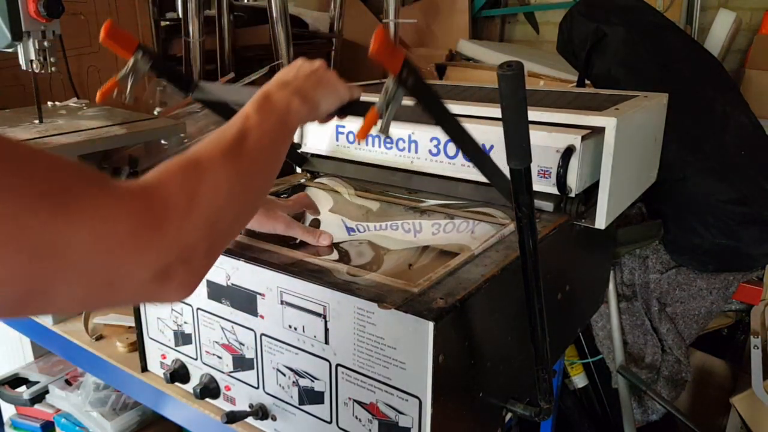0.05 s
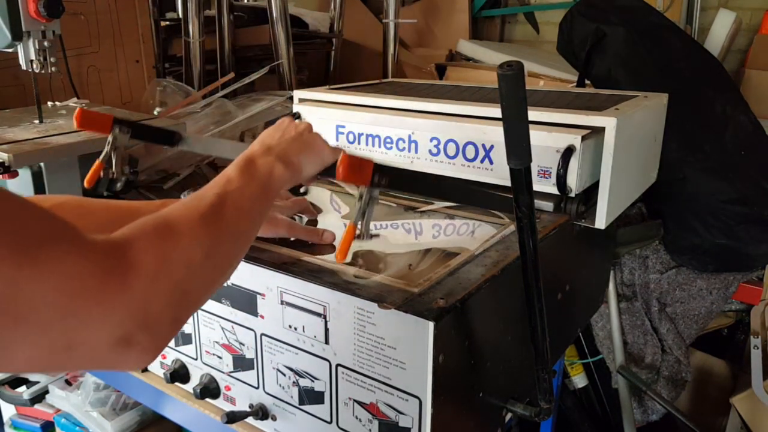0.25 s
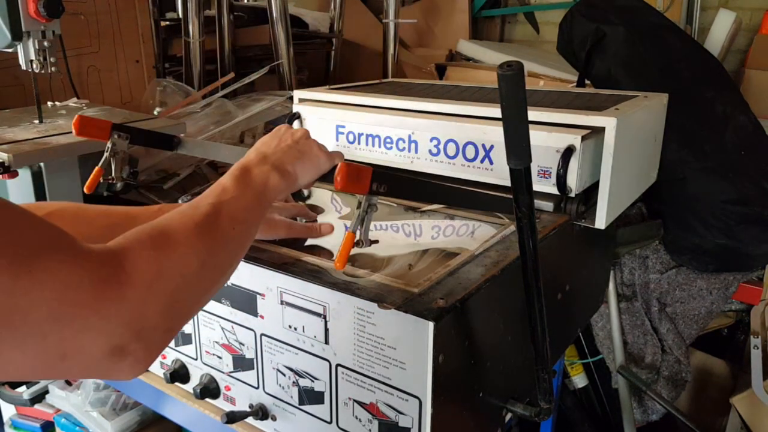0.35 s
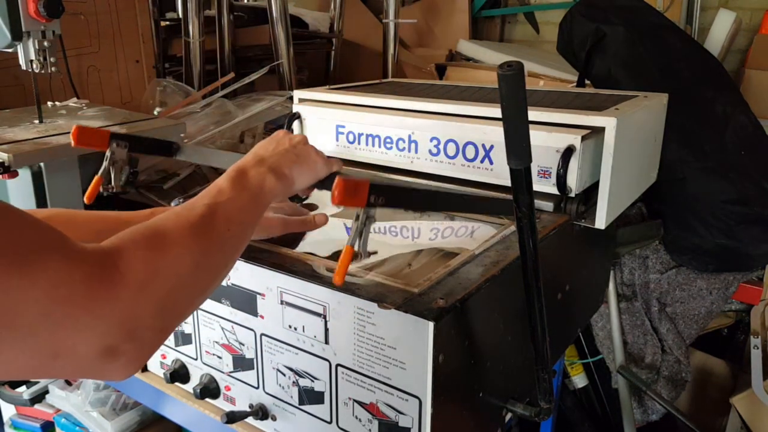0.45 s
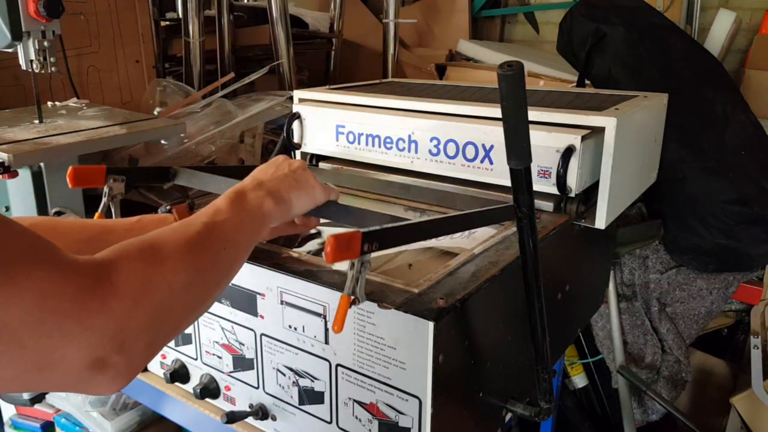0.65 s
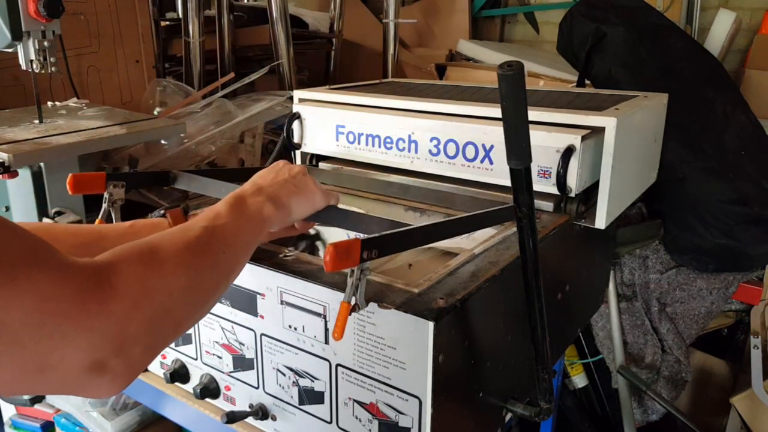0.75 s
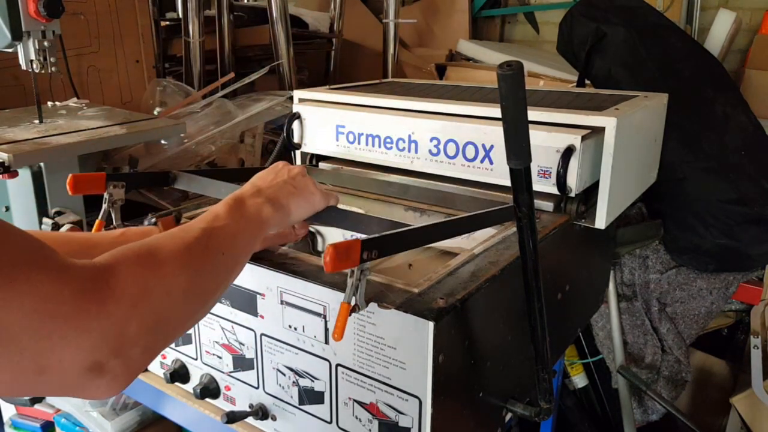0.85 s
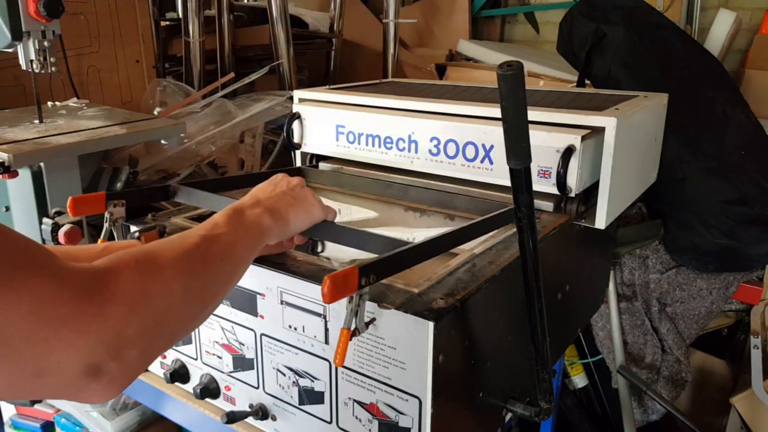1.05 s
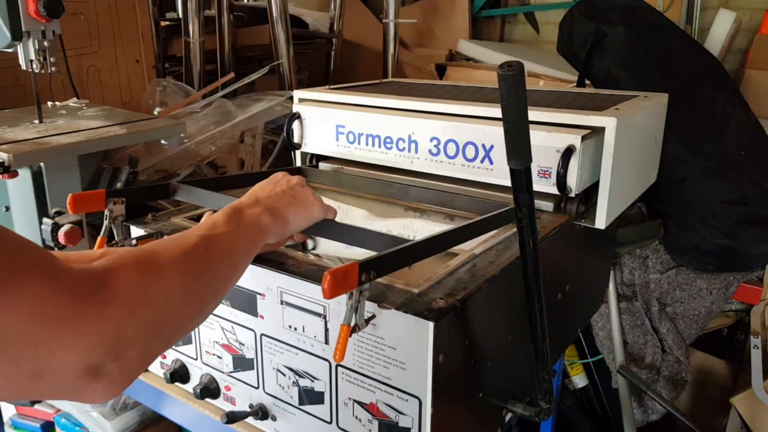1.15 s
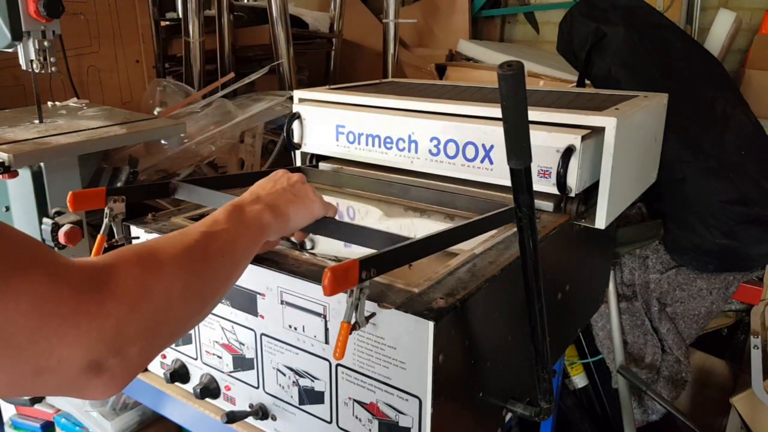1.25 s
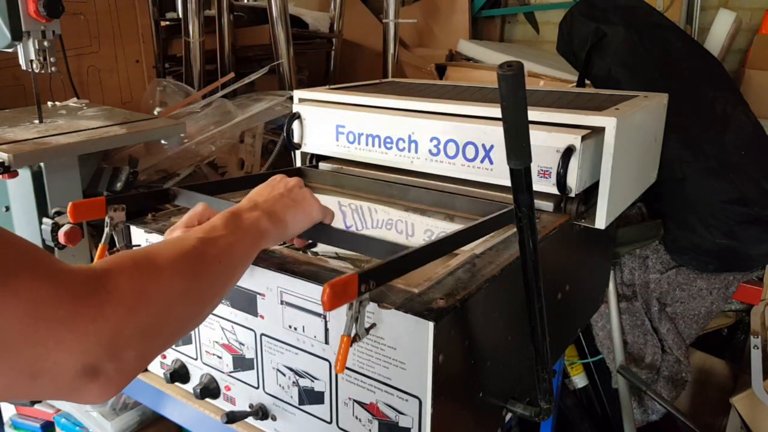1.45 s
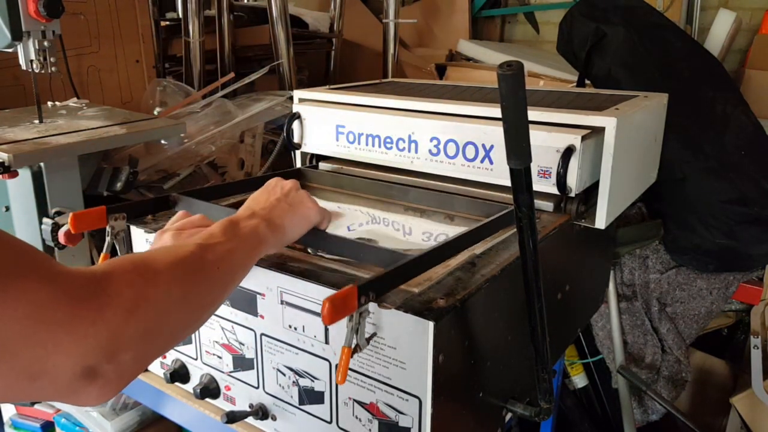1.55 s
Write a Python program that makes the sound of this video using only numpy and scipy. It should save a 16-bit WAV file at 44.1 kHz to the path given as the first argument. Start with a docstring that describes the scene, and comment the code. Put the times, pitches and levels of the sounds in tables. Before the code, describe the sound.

Close up in a small workshop, a metal frame clanks and rattles onto a sheet-metal cabinet, soft thuds and a faint squeal follow, then a sharp steel snap with a low boom, over quiet hum and hiss.

```python
"""Steel frame landing on a machine

A steel clamping frame drops onto a vacuum forming machine in a small workshop and lands with a rattling clank.
It bumps dully as it is pressed home, then a clamp scrapes and snaps shut; a thin squeal comes and goes.
Blows are decaying noise bands plus beating modes; rubs are swelling noise bands; the squeal is wavering sines.
A low hum and a steady bed of rumble and hiss lie beneath, made of shaped noise."""
import sys
import numpy as np
from scipy import signal
from scipy.fft import rfft, irfft
from scipy.io import wavfile

SR = 44100
rng = np.random.default_rng(int(sys.argv[2]) if len(sys.argv) > 2 else 0)


def output_pcm(signal):
    """Save a mono or channel-first signal as 16-bit PCM at the path in sys.argv[1].

    Samples are clipped to [-1, 1] before scaling.
    """
    pcm = np.clip(np.atleast_2d(signal).T, -1, 1) * 32767
    wavfile.write(sys.argv[1], SR, np.round(pcm).astype(np.int16))


N = 70560
T = np.arange(N) / SR  # time [s]
HZ = np.fft.rfftfreq(N, 1 / SR)
LEFT_RIGHT = np.array([[.5], [-.5]])  # splits a left-minus-right difference between the channels

# likeness of the two channels: (frequency [Hz], likeness [-1 to 1])
CHANNEL_LIKENESS = [(60, 1), (140, 0.97), (290, 0.99), (640, 0.55), (1400, 0.42), (3100, 0.061),
                    (7000, 0.15), (15000, 0.95)]
# spectrum of the frame's steel contacts: (frequency [Hz], relative level per Hz [dB])
FRAME_COLOUR = [(40, -43), (75, -30), (100, -25), (130, -12), (155, -16), (195, -2), (250, -5), (310, -11),
                (560, -3.5), (920, -10.5), (1250, -9), (1700, -11.5), (2600, -10.5), (4500, -18.5),
                (8000, -28.5), (12000, -33), (16000, -44)]
# strong modes of frame and cabinet: (frequency [Hz], relative level [dB], T60 [s])
FRAME_MODES = [(143.5, -10, .7), (210, -14, .55), (382, -8, .5), (433, -9, .45), (488, -12, .8),
               (580, -10, .55), (633, -10, .45), (835, -11, .4), (1032, -12, .3), (1260, -13, .3),
               (2021, -14, .35), (2350, -11, .22), (2530, -15, .25), (2616, -13, .3), (2947, -14, .27)]


def amp(db):
    """Decibels to gain."""
    return 10 ** (np.asarray(db) / 20)


def unit(x):
    """Scales to rms 1."""
    return x / np.sqrt(np.mean(x ** 2) + 1e-20)


def read(points, hz):
    """Reads a table on a log-frequency axis."""
    f, value = np.transpose(points)
    return np.interp(np.log(hz + 1), np.log(f + 1), value)


def add(mix, s, sound):
    """Mixes a sound in from time s."""
    part = mix[:, round(s * SR):]
    part += sound[..., :part.shape[1]]


def decay(t60):
    """Exponential die-away that loses 60 dB in t60 seconds."""
    return np.exp(-np.log(1000) * T / t60)


def noise(db, likeness=CHANNEL_LIKENESS):
    """Stereo noise of rms 1: random phases under a given spectrum, with a set likeness of the channels."""
    a, b = np.exp(2j * np.pi * rng.random((2, len(HZ))))
    same = np.clip(read(likeness, HZ), -1, 1)
    mid = a * np.sqrt(1 + same)
    side = b * np.sqrt(1 - same)
    return unit(irfft(np.array([mid + side, mid - side]) * amp(db), N))


def narrow(hz, width_hz):
    """Spectrum in dB of one steep resonance, 12 dB down at the edges of its width."""
    return -40 * np.log10(1 + (2 * (HZ - hz) / width_hz) ** 2)


def lean(x, table):
    """Tips each frequency to the left or right."""
    return irfft(rfft(x) * amp(read(table, HZ) * LEFT_RIGHT), N)


def ripple(count=400):
    """Random narrow peaks and gaps in dB, different in each channel, shallower below 2 kHz."""
    depth_db, spacing_hz = 3.8, 60
    knots = rng.standard_normal((2, count))
    at = np.arange(count) * spacing_hz
    return depth_db * np.minimum(HZ / 2000, 1) * np.array([np.interp(HZ, at, k) for k in knots])


def clatter(colour, t60, tilt_db, rise_s, boost_db=0, count=14):
    """Dense modes of sheet metal and room, as noise in bands that each die at their own speed."""
    octaves = np.log2(np.clip(HZ, 100, None) / 1000)  # the tilt pivots at 1 kHz
    z = rfft(noise(read(colour, HZ) + boost_db + tilt_db * octaves))
    centres = np.geomspace(60, 16000, count)
    out = np.zeros((2, N))
    for hz, band in zip(centres, np.eye(count)):
        out += irfft(z * np.interp(HZ, centres, band), N) * decay(read(t60, hz))
    return out * np.minimum(T / rise_s, 1)


def ring(modes, soft_hz=None, spread_db=1.5, rise_s=0.0042):
    """Strong, slowly beating modes, with level, phase and beat drawn at random for each call."""
    beat_hz, twin_gain = 9.16, 0.39  # every mode has a close, weaker twin, randomly detuned
    out = np.zeros((2, N))
    for hz, db, t60 in modes:
        weight, lag, beat = rng.standard_normal(3)
        start, twin_start = 2 * np.pi * rng.random(2)
        # phase gap between the channels, on a random side
        apart = np.arccos(np.clip(read(CHANNEL_LIKENESS, hz), -1, 1)) * np.sign(lag) * LEFT_RIGHT
        main = np.sin(2 * np.pi * hz * T + start + apart)
        twin = np.sin(2 * np.pi * (hz + beat_hz * beat) * T + twin_start - apart)
        # a soft blow hardly reaches modes above soft_hz
        soft = 1 if soft_hz is None else 1 / (1 + (hz / soft_hz) ** 4)
        out += soft * amp(db + spread_db * weight) * decay(t60) * (main + twin_gain * twin)
    return out * np.minimum(T / rise_s, 1)


def rub(s, length, db, hz, width_hz):
    """A short slide: one band of friction noise swells and stops."""
    swell = np.sqrt(abs(np.sin(np.pi * np.clip((T - s) / length, 0, 1))))
    return amp(db) * noise(narrow(hz, width_hz)) * swell


def clank():
    """The frame lands corner after corner and bounces; every blow stirs the same resonances."""
    # landing blows: (time [s], level [dB], treble tilt [dB per octave], mode level [dB], clang boost [dB])
    blows = [(.209, -29, -0.5, -34, -15), (.217, -25, -0.84, -26.5, -3.5), (.235, -26.5, 1, -28.5, 0),
             (.2985, -29, 3.5, -28, 6)]
    # die-away of the sheet metal: (frequency [Hz], T60 [s])
    t60 = [(100, 1), (250, 0.98), (600, 0.77), (1300, 0.53), (2600, 0.36), (4200, 0.36), (7000, 0.29),
           (15000, 0.3)]
    clang = np.exp(-((HZ - 2600) / 1700) ** 2)  # the band that a hard steel-on-steel hit brings out
    out = np.zeros((2, N))
    peaks = ripple()
    for s, db, tilt, ring_db, clang_db in blows:
        body = amp(db) * clatter(FRAME_COLOUR, t60, tilt, rise_s=0.0016, boost_db=clang_db * clang + peaks)
        add(out, s, body + amp(ring_db) * ring(FRAME_MODES))
    return out


def rattle():
    """A few set cracks among many short, uneven contacts that weaken as the frame settles."""
    # single cracks in the chatter: (time [s], level [dB])
    cracks = [(0.2186, -27), (0.2288, -36), (0.245, -31), (0.299, -34)]
    # die-away of one contact: (frequency [Hz], T60 [s])
    t60 = [(200, 0.037), (2000, 0.068), (12000, 0.022)]
    start_s, contacts_per_s = 0.215, 97
    level_db, fade_db_per_s, spread_db = -26.5, 143, 1.5
    since = np.maximum(T - start_s, 0)
    hits = (rng.random(N) < contacts_per_s / SR) * (since > 0)
    uneven_db = spread_db * np.clip(rng.standard_normal(N), -2, 2)
    train = hits * amp(level_db - fade_db_per_s * since + uneven_db)
    for s, db in cracks:
        train[round(s * SR)] += amp(db)
    contact = clatter(FRAME_COLOUR, t60, tilt_db=0, rise_s=0.0012)
    return signal.fftconvolve(train[None], contact, axes=1)[:, :N]


def cabinet_tone(curve):
    """One clean tone of the cabinet, a sine that wanders in pitch and throbs as it dies away."""
    s, hz, db = np.transpose(curve)
    level = amp(np.interp(T, s, db)) * (T > s[0]) * (T < s[-1])
    turns = np.cumsum(np.interp(T, s, hz)) / SR
    return np.sqrt(2) * level * np.sin(2 * np.pi * turns)


def cabinet_tones():
    """The two strongest tones of the cabinet, low and middle, after the landing."""
    # low tone: (time [s], pitch [Hz], level [dB])
    low = [(.208, 202, -50), (.218, 201, -26), (.262, 193, -34.5), (.295, 211, -24.5), (.335, 223.4, -37),
           (.36, 224.4, -32.5), (.465, 209.4, -46.5), (.5, 213.5, -51), (.55, 205.6, -43), (.615, 203, -56)]
    # middle tone: (time [s], pitch [Hz], level [dB])
    middle = [(.21, 560, -35.5), (.24, 538, -29), (.288, 550, -39), (.32, 555, -28.5), (.43, 527, -52),
              (.6, 514, -62.5)]
    return cabinet_tone(low) + cabinet_tone(middle)


def rubbing():
    """Friction noise: steel skids on steel at the landing, then the frame rubs softly on its seal."""
    # soft rubs after the main bumps: (time [s], length [s], level [dB])
    rustles = [(0.701, 0.049, -67.5), (0.992, 0.058, -66.5)]
    skid = rub(0.2073, length=0.083, db=-33.5, hz=1200, width_hz=310)
    return skid + sum(rub(*row, hz=4340, width_hz=5300) for row in rustles)


def bumps():
    """Soft blows flex a cabinet panel, which swings on, and stir the low modes."""
    # dull bumps: (time [s], level [dB], treble tilt [dB per octave],
    # push level [dB], push frequency [Hz], mode level [dB])
    blows = [(.525, -42, 0.5, -67, 202.7, -39), (.682, -41, 1, -34, 312, -56),
             (.703, -37.5, -1, -31, 198, -49), (0.717, -44, -1.5, -36.5, 83, -30.5),
             (.751, -53, -4, -33, 174, -70), (.85, -52, -0.5, -45, 180.5, -30),
             (.885, -44.5, -1.5, -54, 179, -29.5), (.987, -36.5, -3, -24, 212, -49),
             (1.0, -49, 4.5, -27.5, 214, -47), (1.015, -44.5, -4, -35, 257, -48),
             (1.34, -42, -5, -70, 177, -37), (1.405, -51, 5.5, -50, 183, -60)]
    # spectrum of a bump: (frequency [Hz], relative level per Hz [dB])
    colour = [(30, -34), (70, -14), (100, -25), (145, 4), (175, -12.5), (230, 0), (290, -5.5), (380, -2),
              (750, -17.5), (1500, -28.5), (3000, -40), (5000, -48.5), (10000, -62.5), (16000, -66)]
    # die-away of a bump: (frequency [Hz], T60 [s])
    t60 = [(80, 1), (200, 0.4), (600, 0.2), (3000, 0.37), (12000, 0.77)]
    delay_s, push_cycles = 0.004, 0.68  # a push is one brief flex of the panel
    panel_hz, panel_t60_s, panel_db = 141.6, 0.34, -13.5  # level relative to the push
    out = np.zeros((2, N))
    t = T - delay_s
    swing = np.cos(2 * np.pi * panel_hz * t) * decay(panel_t60_s)
    swing *= amp(panel_db) * np.minimum(T / delay_s, 1)
    for s, db, tilt, push_db, push_hz, ring_db in blows:
        turns = push_hz * (t - s)
        out += amp(push_db) * np.cos(2 * np.pi * turns) * np.exp(-(turns / push_cycles) ** 2)
        body = amp(db) * clatter(colour, t60, tilt, rise_s=0.0046)
        modes = amp(ring_db) * ring(FRAME_MODES, soft_hz=177)
        add(out, s, body + amp(push_db) * swing + modes)
    return out


def ticks():
    """Short, dry contacts of steel on steel at the two main bumps, as fast-dying noise."""
    # light contacts: (time [s], level [dB])
    touches = [(.682, -54), (.9875, -46)]
    # spectrum of a tick: (frequency [Hz], relative level per Hz [dB])
    colour = [(200, 12), (420, 9.5), (1200, -10), (2500, -13.5), (5000, -23), (10000, -17), (16000, -37)]
    # die-away of a tick: (frequency [Hz], T60 [s])
    t60 = [(500, 0.12), (10000, 0.03)]
    out = np.zeros((2, N))
    for s, db in touches:
        add(out, s, amp(db) * clatter(colour, t60, tilt_db=0, rise_s=0.00062))
    return out


def clamp():
    """The jaw scrapes, snaps with a bright steel ring and settles; the cabinet booms as it bites."""
    # snap and settling: (time [s], level [dB], treble tilt [dB per octave])
    snaps = [(1.1544, -25.5, 0.5), (1.172, -42, -4.5), (1.449, -64, -5.5)]
    # spectrum of a snap: (frequency [Hz], relative level per Hz [dB])
    snap_colour = [(40, -48), (200, -8.5), (700, -6), (1300, -1), (2200, -5.5), (4000, 1), (4800, -2.5),
                   (6700, 4.5), (8500, -1.5), (11000, -2.5), (13000, -12.5), (16000, -17)]
    # die-away of a snap: (frequency [Hz], T60 [s])
    snap_t60 = [(200, 1), (1200, 0.5), (3000, 0.4), (7000, 0.27), (14000, 0.2)]
    # modes of the steel clamp: (frequency [Hz], relative level [dB], T60 [s])
    steel_modes = [(1254, -8, .55), (3219, -12, .42), (3790, -9, .26), (3925, -5, .3), (3980, -8, .28),
                   (5345, -1, .26), (5744, -2, .2), (5835, -5, .35), (6560, 11, .06), (7024, 0, .23),
                   (7849, -2, .22)]
    # spectrum of the cabinet boom: (frequency [Hz], relative level per Hz [dB])
    boom_colour = [(40, -21), (90, -33), (130, 2), (205, 3), (280, 0), (350, -7.5), (530, -5.5),
                   (750, -28.5), (2000, -42)]
    # die-away of the cabinet boom: (frequency [Hz], T60 [s])
    boom_t60 = [(100, 0.57), (250, 0.63), (700, 0.41)]
    # stereo lean of the clamp: (frequency [Hz], left minus right [dB])
    side_lean = [(1000, 0), (4500, 0), (6500, -5), (8300, 5.5), (9700, 4), (11000, -0.5), (15000, 4)]
    rise_s, steel_db = 0.001, -10.5  # ring level relative to the snap
    out = rub(1.12, length=0.06, db=-58, hz=1300, width_hz=1200)
    peaks = ripple()
    for s, db, tilt in snaps:
        steel = amp(steel_db) * ring(steel_modes, rise_s=rise_s)
        add(out, s, amp(db) * (clatter(snap_colour, snap_t60, tilt, rise_s, peaks) + steel))
    boom = amp(-29) * clatter(boom_colour, boom_t60, tilt_db=0, rise_s=0.015)
    add(out, 1.158, boom)
    return lean(out, side_lean)


def squeal():
    """A faint, unsteady tone on the left, as of metal rubbing in a hinge: wavering sines plus rasp."""
    # loudness curve: (time [s], level [dB])
    curve = [(0.488, -72), (.58, -61.5), (0.691, -58), (.83, -70), (0.971, -81), (1.08, -74), (1.15, -60),
             (1.201, -90)]
    # partials: (frequency [Hz], relative level [dB])
    partials = [(1186, 0), (1945, -19)]
    pitch_waver, flutter_db = 0.0044, 1  # waver as a share of the pitch
    rasp_db, left_minus_right_db = -10.5, 6
    s, db = np.transpose(curve)
    waver = noise(narrow(0, width_hz=55))[0]
    flutter = noise(narrow(0, width_hz=113))[0]
    warped_s = np.cumsum(1 + pitch_waver * waver) / SR
    tone = sum(amp(part_db) * np.sin(2 * np.pi * hz * warped_s) for hz, part_db in partials)
    level = np.interp(T, s, db, left=-120, right=-120) + flutter_db * flutter
    rasp = amp(rasp_db) * noise(narrow(partials[0][0], width_hz=280))  # friction noise around the tone
    return (np.sqrt(2) * tone + rasp) * amp(level + left_minus_right_db * LEFT_RIGHT)


def background():
    """A wavering low hum of narrow noise, slowly easing, over a steady bed of low rumble and treble hiss."""
    # spectrum of the steady bed: (frequency [Hz], relative level per Hz [dB])
    floor = [(20, -26), (45, -27), (72, 1), (105, -17.5), (145, -2), (230, -7), (310, -17), (560, -15),
             (850, -27), (1700, -33), (3000, -39.5), (4500, -35.5), (7500, -52), (12500, -38.5),
             (16000, -42.5)]
    # likeness of the channels in the steady bed, wide in the middle range, central in the treble hiss:
    # (frequency [Hz], likeness [-1 to 1])
    floor_likeness = [(60, 0.89), (140, 1), (300, 0.87), (1400, 0.17), (4000, 0.067), (12000, 1)]
    hum_db, fade_db_per_s, floor_db = -51.5, 5.5, -53
    hum = amp(hum_db - fade_db_per_s * T) * noise(narrow(208.2, width_hz=60))
    return hum + amp(floor_db) * noise(read(floor, HZ), floor_likeness)


def scene():
    """All sources together."""
    landing = clank() + rattle() + cabinet_tones() + rubbing()
    pressing = bumps() + ticks()
    return landing + pressing + clamp() + squeal() + background()


def record(dry):
    """The microphone pair leans left, most in the low and middle range; then a low-pass limits the band."""
    # stereo lean of the pair: (frequency [Hz], left minus right [dB])
    left_lead = [(60, 2), (200, 2.04), (400, 2.5), (800, 3), (2400, 4), (5000, 0), (15000, 1)]
    edge = signal.firwin(511, 16000, window=("kaiser", 9), fs=SR)  # cutoff in Hz
    return signal.oaconvolve(lean(dry, left_lead), edge[None], "same")


dry = scene()
out = record(dry)
output_pcm(out)
```